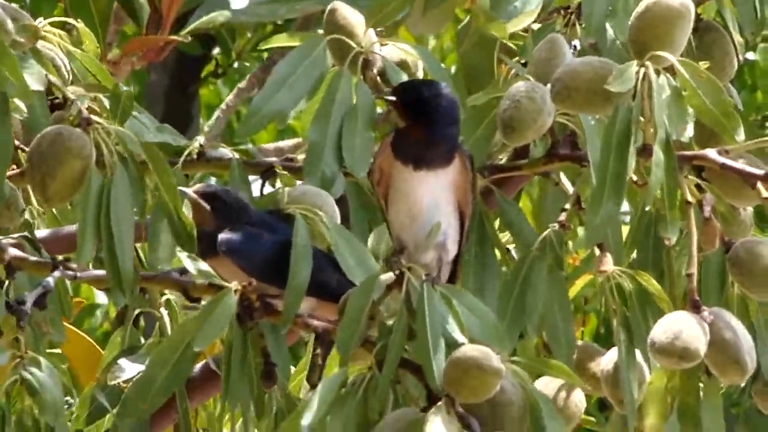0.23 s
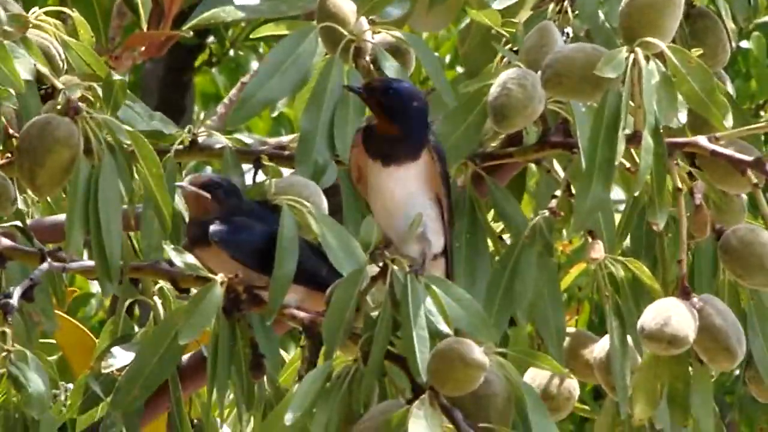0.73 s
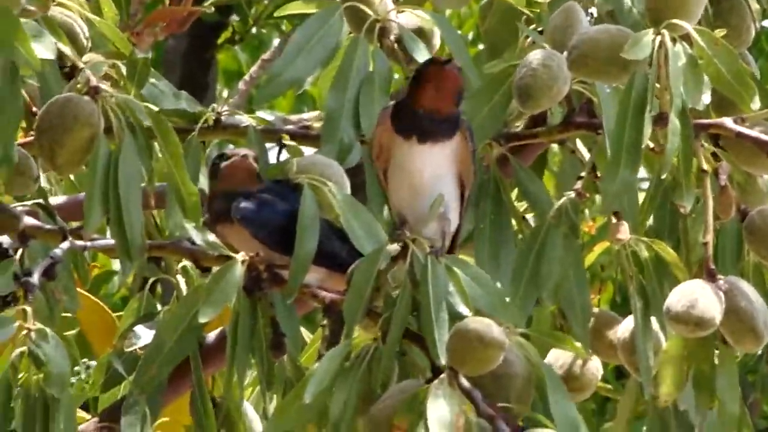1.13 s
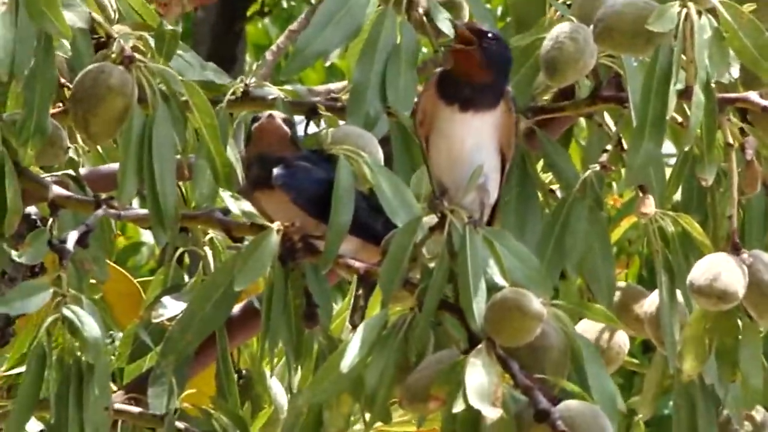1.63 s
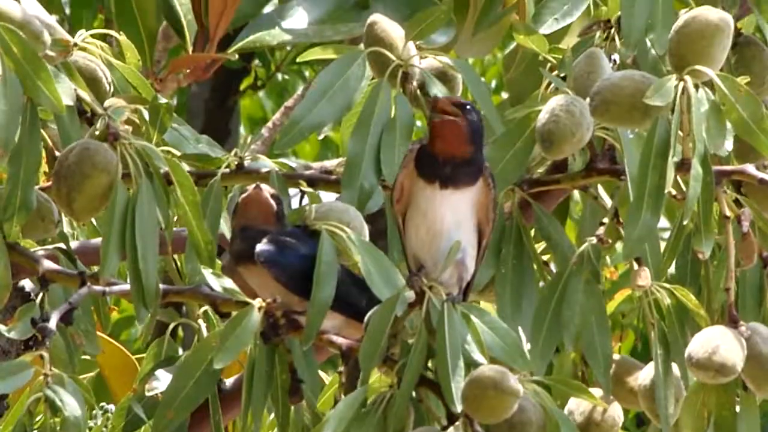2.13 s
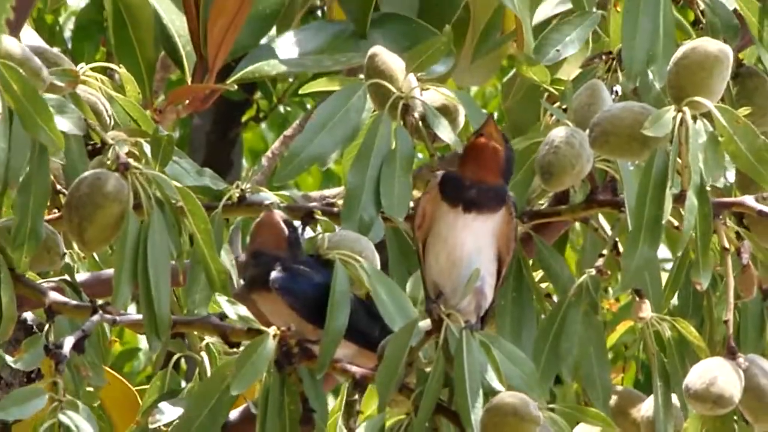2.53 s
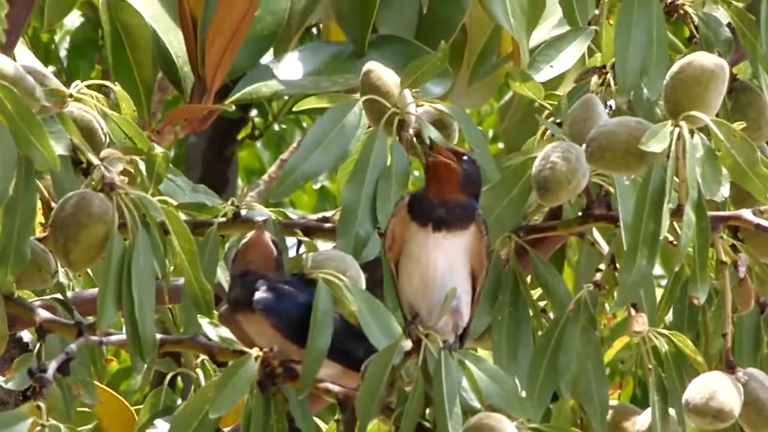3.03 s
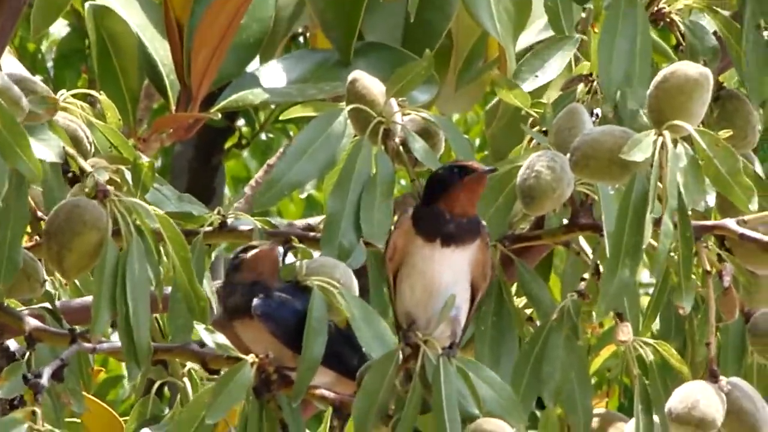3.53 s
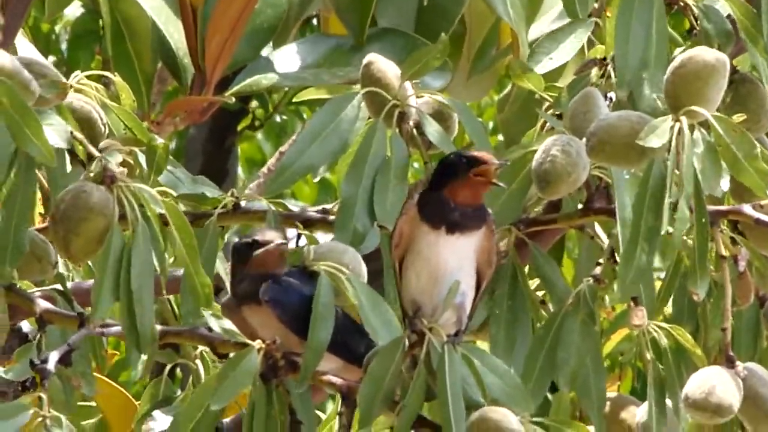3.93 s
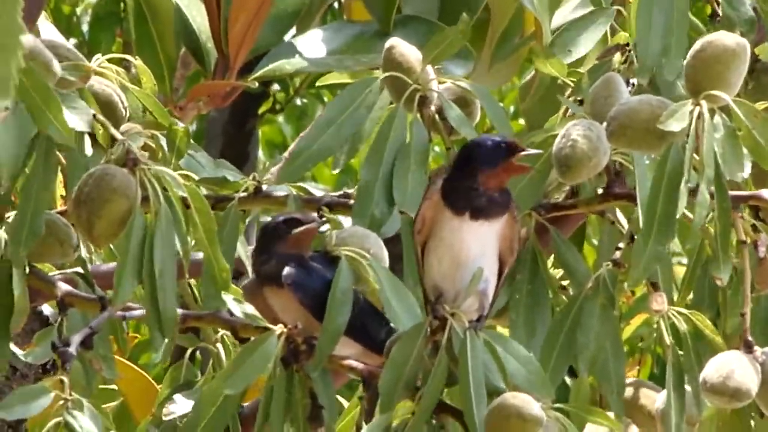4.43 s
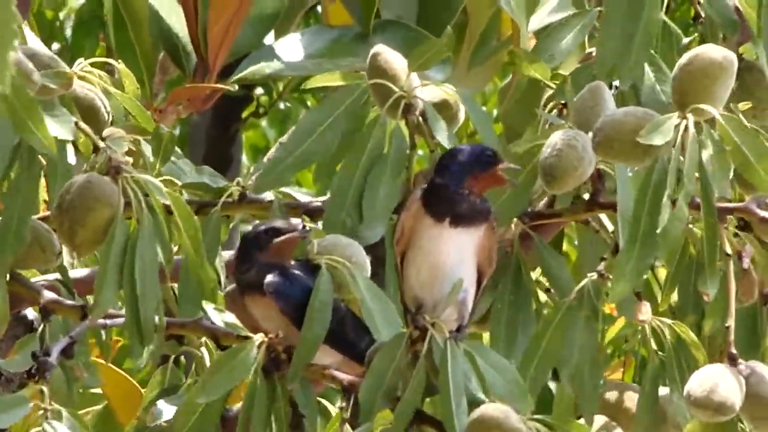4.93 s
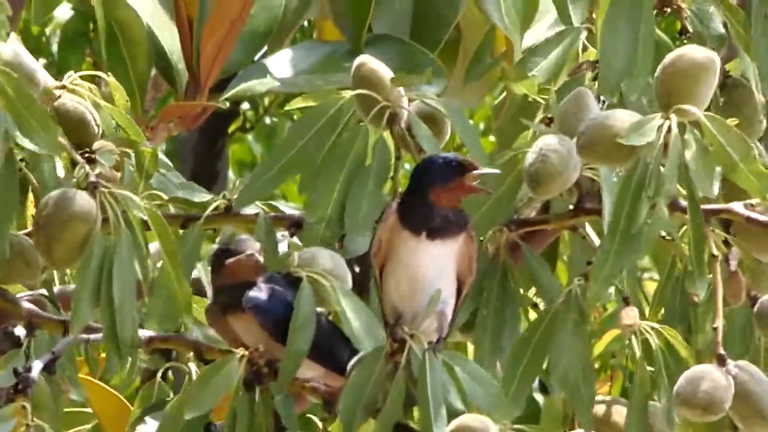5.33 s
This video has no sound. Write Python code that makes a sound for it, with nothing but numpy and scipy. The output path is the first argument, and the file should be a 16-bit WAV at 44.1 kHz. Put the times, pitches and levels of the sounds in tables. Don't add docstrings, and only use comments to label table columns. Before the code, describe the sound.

Outdoors in an orchard tree, small birds give short high chirps, thin whistles and burred slides over a faint far twitter. Wind buffets the single handheld microphone, with a strong low thump at about 0.3 seconds and weaker puffs until 1.5. Leaves hiss and distant traffic washes by. From about 2.8 seconds, sharp plastic ticks and brief finger rubs break through as the wind calms.

```python
import sys
import numpy as np
from scipy import signal
from scipy.fft import rfft, irfft, next_fast_len
from scipy.io import wavfile
from scipy.ndimage import uniform_filter1d, map_coordinates

SR = 44100
rng = np.random.default_rng(int(sys.argv[2]) if len(sys.argv) > 2 else 0)


def digitize_waveform(pressure):
    field = np.atleast_2d(pressure).T
    bounded = np.clip(field, -1, 1)
    quanta = np.round(bounded * 32767).astype(np.int16)
    wavfile.write(sys.argv[1], SR, quanta)


def voltage_ratio(decibels):
    exponent = np.asarray(decibels, float) / 20
    return 10 ** exponent


N = 246519


def unit(x):
    return x / np.sqrt(np.mean(x ** 2) + 1e-20)


def along(points, hz):
    f, v = np.transpose(points)
    return np.interp(np.log(hz + 1), np.log(f + 1), v)


def curves(rows):
    s, *columns = np.transpose(rows)
    return [np.interp(np.arange(N) / SR, s, column) for column in columns]


def wobble(rate, size=N):
    knots = rng.standard_normal(size // 40 + 4)
    return map_coordinates(knots, [np.arange(size) * rate / SR])


def filtered(x, response):
    m = next_fast_len(len(x) + 8192)
    return irfft(rfft(x, m) * response(np.fft.rfftfreq(m, 1 / SR)), m)[:len(x)]


def rush(spectrum, patchy_db):
    z = signal.stft(rng.standard_normal(N), nperseg=512)[2]
    field = uniform_filter1d(rng.standard_normal(z.shape), size=8, axis=0)
    field = unit(uniform_filter1d(field, size=10, axis=1))
    noise = signal.istft(z * voltage_ratio(patchy_db * field), nperseg=512)[1][:N]
    return unit(filtered(noise, lambda hz: voltage_ratio(along(spectrum, hz))))


def add(track, s, x):
    i = round(s * SR)
    track[i:i + len(x)] += x[:N - i]


def glide(length, start_hz, end_hz, stray, flutter_db, rate, soft):
    u = np.arange(round(length * SR)) / (length * SR)
    pitch_stray = stray * wobble(rate, size=SR // 2)[:len(u)]
    flutter = wobble(rate, size=SR // 2)[:len(u)]
    hz = (start_hz + (end_hz - start_hz) * u) * (1 + pitch_stray)
    phase = 2 * np.pi * np.cumsum(hz) / SR
    swell = np.sin(np.pi * u) ** soft
    return swell * voltage_ratio(flutter_db * flutter) * np.sin(phase)


def sing(track, s, length, hz, ratio, db, burr):
    for side_db in (0, -14 + 14 * burr):
        voice = glide(length, hz, hz * ratio, .075 * burr, 5 * burr, rate=420, soft=.7)
        add(track, s, voltage_ratio(db - 3 + side_db) * voice)


# start in seconds, starting pitch in Hz, peak level in dB.
FALLING_CHIRPS = [(1.975, 3500, -42.5), (2.197, 3450, -39.5), (2.35, 3750, -46), (2.423, 3320, -43),
                  (2.633, 3410, -40), (2.791, 3860, -48), (2.858, 3400, -41), (3.635, 3480, -47),
                  (4.293, 4105, -41), (4.41, 4400, -44), (4.928, 4250, -40.5)]


def falling_chirps(track):
    for s, hz, db in FALLING_CHIRPS:
        sing(track, s, .027, hz, .84, db, burr=.15)


# start in seconds, starting pitch in Hz, peak level in dB.
RISING_CHIRPS = [(.27, 4600, -65), (.683, 3400, -35), (1.857, 3220, -38), (1.872, 3600, -34.5),
                 (1.87, 4650, -45), (2.477, 4100, -42.5), (3.012, 3950, -47), (4.385, 3900, -49),
                 (4.968, 3800, -45)]


def rising_chirps(track):
    for s, hz, db in RISING_CHIRPS:
        sing(track, s, .0217, hz, 1.18, db, burr=.31)


# start in seconds, length in seconds, pitch in Hz, peak level in dB.
LEVEL_WHISTLES = [(.135, .06, 4320, -47), (3.49, .07, 3800, -47), (3.028, 0.021, 4720, -41.5),
                  (.692, 0.072, 4800, -39.5), (1.697, .062, 4580, -50), (1.815, .026, 5100, -39),
                  (1.81, 0.022, 5950, -41.5), (1.819, .035, 3030, -38), (2.105, 0.047, 4200, -39),
                  (2.985, 0.016, 3710, -43), (3.356, 0.051, 4060, -47), (3.38, .038, 3200, -47),
                  (3.964, 0.04, 4480, -40), (4.33, 0.044, 5650, -53), (4.395, .045, 4300, -44.5),
                  (.315, 0.027, 3800, -48), (5.007, 0.026, 3920, -34.5), (5.54, 0.03, 4610, -52)]


def level_whistles(track):
    for s, length, hz, db in LEVEL_WHISTLES:
        sing(track, s, length, hz, .97, db, burr=.373)


# start in seconds, length in seconds, starting pitch in Hz, peak level in dB.
ROUGH_CHURRS = [(1.329, .1, 4420, -39.5), (1.379, 0.24, 5140, -52), (1.499, .25, 4700, -50.5),
                (1.456, 0.15, 3830, -49), (1.888, .03, 3900, -52), (2.858, 0.033, 3400, -43),
                (3.749, 0.058, 4210, -46), (3.982, 0.066, 4340, -42), (4.319, 0.083, 3780, -49),
                (5.037, 0.053, 3510, -46.5), (2.7, 0.067, 3140, -47), (3.795, 0.051, 3270, -56)]


def rough_churrs(track):
    for s, length, hz, db in ROUGH_CHURRS:
        sing(track, s, length, hz, .92, db, burr=.696)


# start in seconds, length in seconds, starting pitch in Hz, peak level in dB.
LONG_SLIDES = [
    (.122, .08, 4950, -41.5),
    (.595, .055, 5150, -39.5),
    (.635, .05, 4400, -40),
    (2.8, .065, 4850, -37.5),
    (2.12, 0.068, 4700, -39),
]


def long_slides(track):
    for s, length, hz, db in LONG_SLIDES:
        sing(track, s, length, hz, .87, db, burr=.58)


# start in seconds, pitch in Hz.
HIGH_SINGER = [
    (4.25, 6200),
    (4.408, 7000),
    (4.66, 7450),
    (4.69, 6420),
    (4.789, 7320),
    (4.869, 6670),
    (4.96, 6450),
]


def high_singer(track):
    for s, hz in HIGH_SINGER:
        sing(track, s, .084, hz, 1, -54.5, burr=.305)


# middle in seconds, half length in seconds, level in dB.
TWITTER_BOUTS = [
    (0.296, .1, -52),
    (.66, 0.13, -55),
    (1.495, 0.26, -47.5),
    (1.802, .15, -52),
    (2.3, .3, -56),
    (2.834, 0.16, -50),
    (3.414, .18, -54),
    (3.926, 0.34, -56),
    (4.36, .12, -54.5),
    (5.046, 0.17, -54),
]


def far_flock():
    twitter, t = np.zeros(N), np.arange(N) / SR
    for s, pitch, slide, size in rng.random((1500, 4)):
        hz = 3500 + 1900 * pitch
        note = glide(.03, hz, hz * (.92 + .16 * slide), .03, 2, rate=300, soft=1)
        add(twitter, s * N / SR, voltage_ratio(3 * size) * note)
    swell = sum(voltage_ratio(db) * np.exp(-2 * ((t - s) / half) ** 2) for s, half, db in TWITTER_BOUTS)
    return unit(twitter) * swell


def birds():
    song = far_flock()
    for singer in (falling_chirps, rising_chirps, level_whistles, rough_churrs, long_slides, high_singer):
        singer(song)
    t = np.arange(SR // 5) / SR
    scatter = rng.standard_normal(len(t)) * voltage_ratio(-60 * t / .25)
    return song + voltage_ratio(-3.5) * signal.fftconvolve(song, scatter / np.linalg.norm(scatter))[:N]


# start in seconds, pitch in Hz, number of cycles, peak level in dB.
WIND_PUFFS = [(0.029, 79.4, 4.1, -33), (0.228, 93, 1.6, -18), (.281, 295, 5.6, -8.5), (.293, 404, 6.9, -19),
              (.302, 183, 5.8, -12), (.334, 149, 3.3, -31), (0.3, 33, 2.2, -18), (0.315, 316, 5.2, -18),
              (.294, 590, 6, -36), (0.293, 985, 7, -33), (0.508, 190, 5, -19.5), (0.514, 46, 1.7, -16),
              (.501, 120, 2.1, -23.5), (0.537, 230, 3.8, -24.5), (.562, 150, 2, -22), (.585, 145, 1.6, -19),
              (0.731, 54, 2.5, -25.5), (.84, 137, 2.8, -25.5), (0.971, 151, 3.1, -25.5),
              (1.005, 110, 1.7, -28.5), (1.045, 69, 1.04, -20.5), (1.301, 110.6, 8.1, -27.5),
              (1.36, 298, 2.8, -27), (1.46, 60.6, 4.4, -31), (2.019, 55.6, 2.5, -38), (2.447, 55, 3.1, -48)]
# frequency in Hz, level in dB per Hz.
PUFF_COLOUR = [(100, 3.5), (300, -6), (500, -22.5), (1000, -33), (2000, -62)]


def puffs():
    out = np.zeros(N)
    rise = .11
    for s, hz, cycles, db in WIND_PUFFS:
        start_hz, end_hz = hz * (1 - rise / 2), hz * (1 + rise / 2)
        add(out, s, voltage_ratio(db) * glide(cycles / hz, start_hz, end_hz, stray=.035, flutter_db=1, rate=90, soft=1.2))
    strength = np.sqrt(np.abs(uniform_filter1d(out ** 2, size=400)))
    return out + voltage_ratio(-5.5) * strength * rush(PUFF_COLOUR, patchy_db=-1.0)


# start in seconds, knock pitch in Hz, knock level in dB, crackle level in dB.
BODY_TICKS = [(2.785, 3460, -36, -47.5), (2.8965, 1470, -25, -41.5), (2.8968, 4350, -29.5, -52),
              (2.905, 7460, -33, -52), (3.351, 4100, -39, -51), (3.4475, 1260, -33, -41),
              (3.4488, 1940, -36, -57), (3.453, 2960, -34, -65), (3.956, 3300, -44, -60),
              (3.959, 2510, -36, -59), (4.6156, 1530, -42, -37.5), (4.617, 806, -36, -44),
              (5.056, 2420, -42, -57), (5.147, 2380, -33.5, -50.5)]
# frequency in Hz, level in dB per Hz.
CRACKLE_COLOUR = [(500, 4), (1200, 6), (3000, 1), (6500, 5), (9000, -3.5), (15500, -8)]


def ticks():
    knocks, crackle, t = np.zeros(N), np.zeros(N), np.arange(SR // 4) / SR
    for s, hz, knock_db, crackle_db in BODY_TICKS:
        snap_db = (knock_db + crackle_db) / 2 + 3.5
        knock = voltage_ratio(knock_db - 60 * t / .009) * (1 - np.exp(-t / .0006))
        add(knocks, s, knock * 4 * np.sin(2 * np.pi * hz * t))
        add(crackle, s, voltage_ratio(snap_db - 60 * t / .01) + voltage_ratio(crackle_db + 4 - 60 * t / .12))
    return knocks + voltage_ratio(1.5 * wobble(500)) * crackle * rush(CRACKLE_COLOUR, patchy_db=.5)


# start in seconds, level in dB, time to fall 60 dB in seconds.
FINGER_RUBS = [(1.272, -41, 0.13), (2.095, -43, 0.25), (2.35, -41.5, 0.11), (2.73, -52, .08),
               (2.778, -42, .08), (2.852, -44, .06), (2.896, -46, .13), (3.03, -60, .06), (3.269, -44, .12),
               (3.417, -48, .06), (3.448, -34, 0.11), (3.887, -45, .2), (3.92, -48, 0.28),
               (3.96, -46.5, .24), (4.415, -57, .1), (4.526, -49, .1), (4.616, -45, 0.16),
               (5.532, -46.5, .2)]
# frequency in Hz, level in dB per Hz.
RUB_COLOUR = [(1500, -7), (4000, 3), (8000, -2.5), (12000, -4), (15700, -8)]


def rubs():
    rub, t = np.zeros(N), np.arange(SR // 4) / SR
    for s, db, t60 in FINGER_RUBS:
        add(rub, s, voltage_ratio(db + 0.5 - 60 * t / t60) * (1 - np.exp(-t / (.021 * t60))))
    return voltage_ratio(1.5 * wobble(500)) * rub * rush(RUB_COLOUR, patchy_db=.5)


# time in seconds, leaf hiss in dB, buffeting of the microphone in dB.
WIND_STRENGTH = [(0, -58, -35.5), (.15, -56, -41.5), (.36, -60, -30.5), (.55, -57.5, -32.5),
                 (.68, -53.5, -31.5), (1.37, -53.5, -34), (1.5, -54, -43), (2.3, -58, -46), (2.8, -57, -50),
                 (3.4, -62, -49), (4.1, -63, -53), (4.7, -62.5, -52.5), (5.59, -60, -49)]
# frequency in Hz, level in dB per Hz.
LEAF_COLOUR = [(1200, -17.5), (3000, 1), (5000, -0.5), (7000, -1.5), (10000, -7), (13000, -10),
               (15700, -13)]
# frequency in Hz, level in dB per Hz.
BUFFET_COLOUR = [(15, -5.5), (30, 2.5), (60, -0.5), (100, -10), (200, -20.5), (400, -44.5)]


def wind():
    leaf_db, buffet_db = curves(WIND_STRENGTH)
    leaves = voltage_ratio(leaf_db + 8 + 0.14 * wobble(3.54)) * rush(LEAF_COLOUR, patchy_db=1.36)
    buffet = unit(voltage_ratio(1.2 * wobble(12)) * rush(BUFFET_COLOUR, patchy_db=.3))
    return leaves + voltage_ratio(buffet_db + 1) * buffet


# time in seconds, level in dB.
ROAD_WASH = [(0, -47), (.45, -44), (.8, -42), (1.2, -41), (1.4, -40), (1.7, -43), (2.3, -42.5), (2.8, -43),
             (3.2, -46.5), (4.6, -47), (5.59, -46.5)]
# frequency in Hz, level in dB per Hz.
WASH_COLOUR = [(100, -8), (300, -0.5), (500, 0), (1000, -3.5), (1300, -5), (2500, -9.5), (4000, -10),
               (7000, -19.5), (11000, -30.5), (15700, -56)]
# frequency in Hz, level in dB per Hz.
DRONE_COLOUR = [(50, -4), (90, 4.5), (150, -1.5), (250, -3), (500, -35)]


def traffic():
    drone = voltage_ratio(-48.5 + 2.5 * wobble(2.59)) * rush(DRONE_COLOUR, patchy_db=0.45)
    wash = voltage_ratio(curves(ROAD_WASH)[0] + 0.52 * wobble(6.5)) * rush(WASH_COLOUR, patchy_db=0.75)
    return drone + wash


def scene():
    return np.tile(birds() + puffs() + ticks() + rubs() + wind() + traffic(), (2, 1))


def gain_control(x):
    t = np.arange(SR) / SR
    memory = np.exp(-t / .3) * (1 - np.exp(-t / .07))
    loudness = np.abs(signal.fftconvolve(x ** 2, memory / memory.sum())[:N])
    return x / np.sqrt(1 + loudness / voltage_ratio(-54))


def thin_top(x):
    top = filtered(x, lambda hz: (hz > 15830) * 1.)
    burst = uniform_filter1d(top ** 2, size=300)
    return x - top * np.where(burst > 20 * np.median(burst), .94, 1)


def stray_bands(x):
    splits_per_s, low_hz, high_hz, width_hz = 4.3, 4100, 14200, 1700
    hz, t, z = signal.stft(x, SR, nperseg=1024)
    when, where = rng.random((round(splits_per_s * N / SR), 2)).T
    split = np.zeros(z.shape)
    for s, lo in zip(when * N / SR, low_hz * (high_hz / low_hz) ** where):
        split += (abs(t - s) < .013) * ((hz > lo) & (hz < lo + width_hz))[:, None]
    scrambled = z * np.exp(2j * np.pi * rng.random(z.shape))
    return signal.istft(voltage_ratio(-1.5) * split * scrambled, SR, nperseg=1024)[1][:N]


def roll_off(x):
    return signal.sosfilt(signal.butter(12, 16850, fs=SR, output="sos"), x)


def record(dry):
    x = gain_control(dry[0])
    x = filtered(x, lambda hz: np.sqrt(1 - .997 / (1 + ((hz - 7795) / 260) ** 2)))
    x = thin_top(x)
    side = stray_bands(x)
    return roll_off(np.array([x + side, x - side]))


dry = scene()
out = record(dry)
digitize_waveform(out)
```